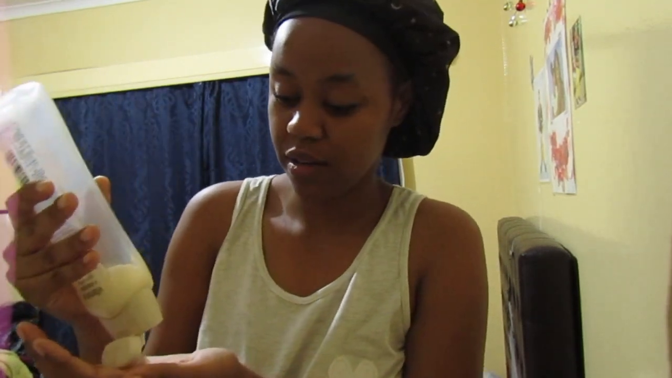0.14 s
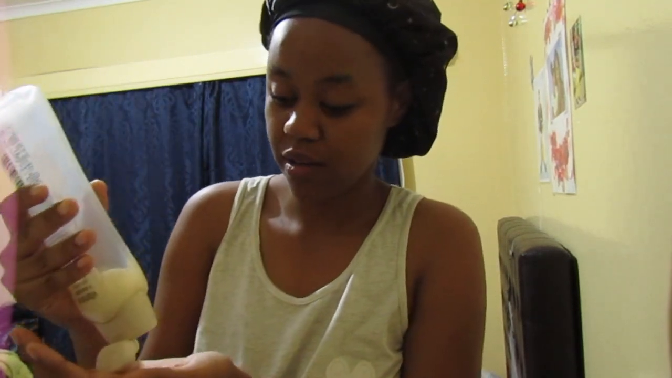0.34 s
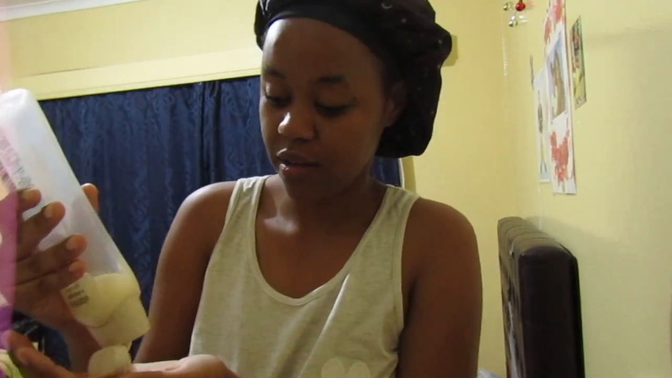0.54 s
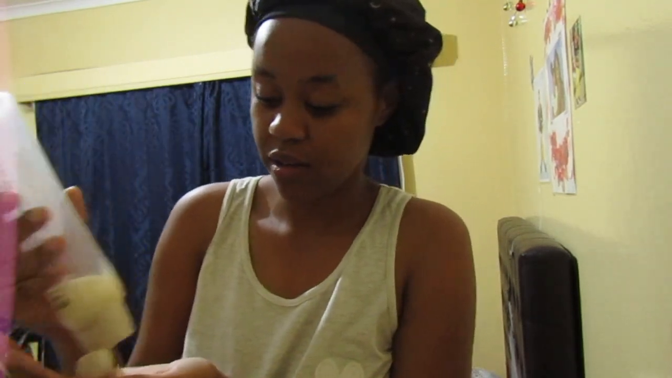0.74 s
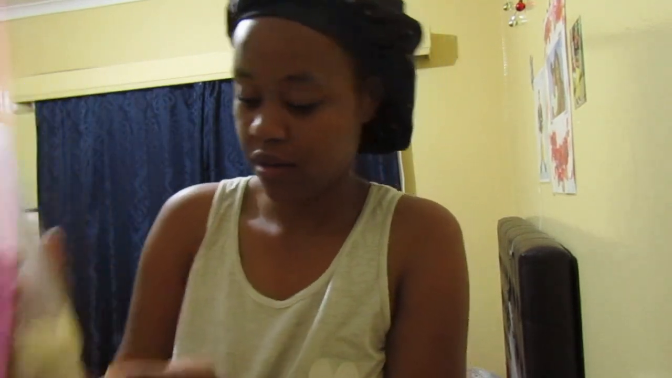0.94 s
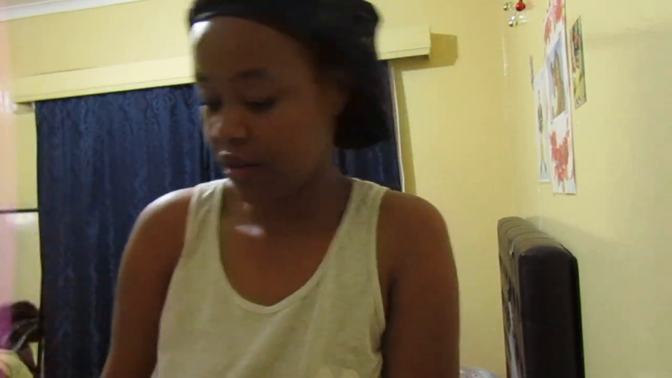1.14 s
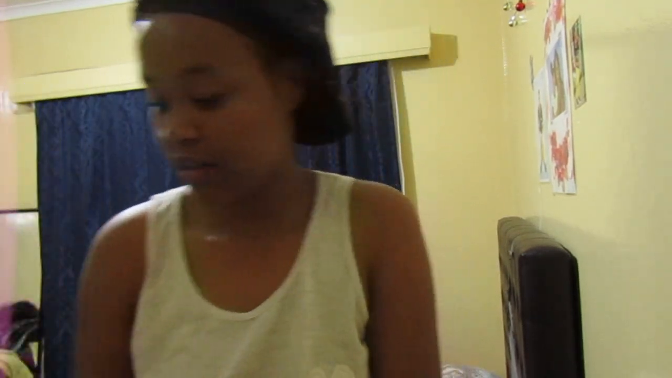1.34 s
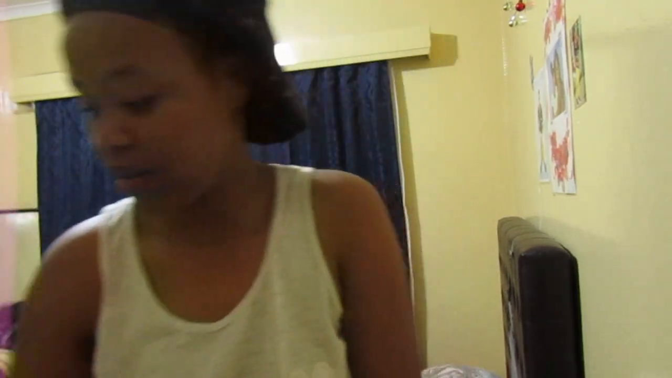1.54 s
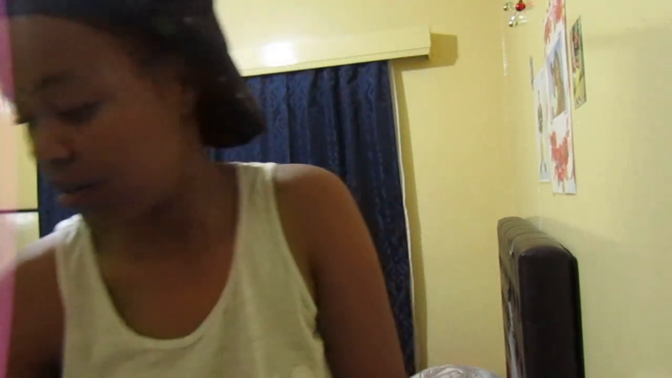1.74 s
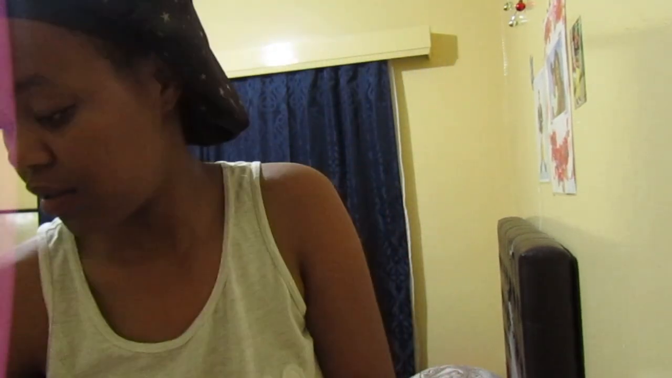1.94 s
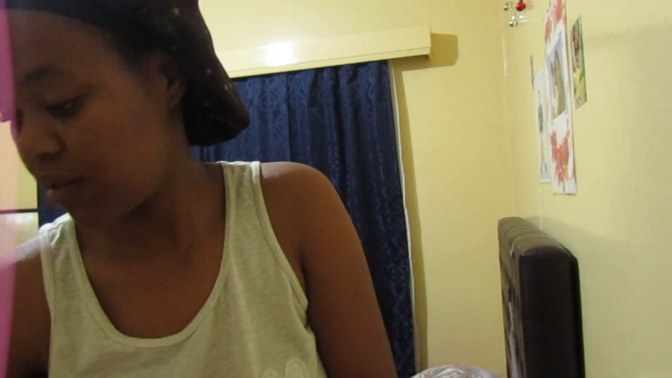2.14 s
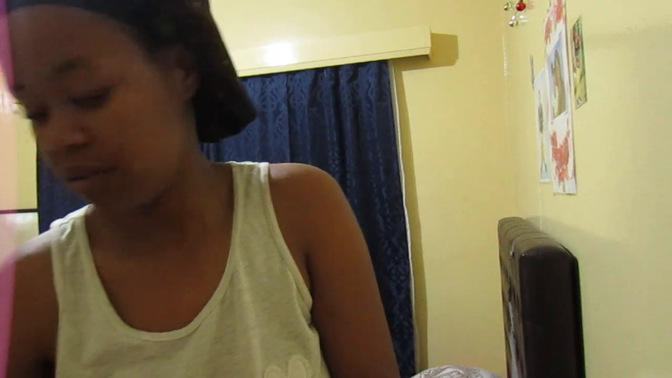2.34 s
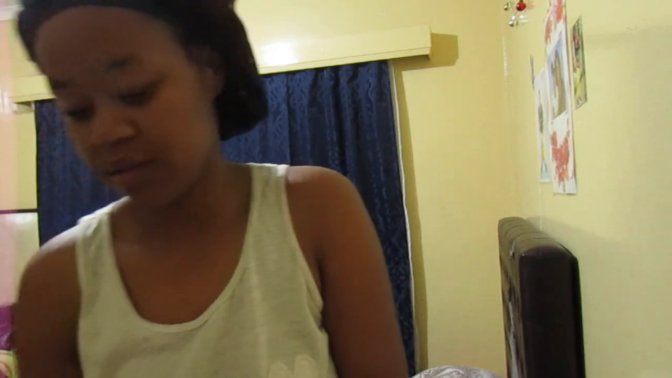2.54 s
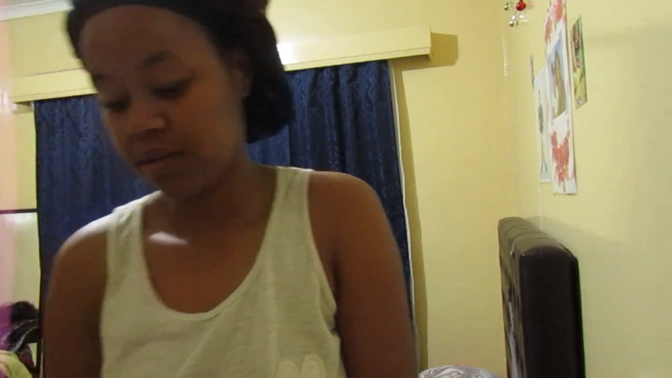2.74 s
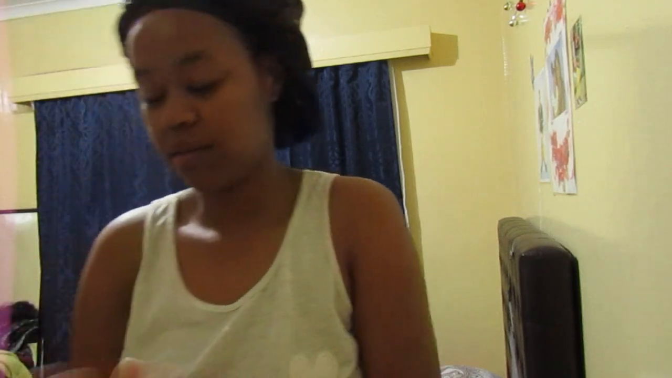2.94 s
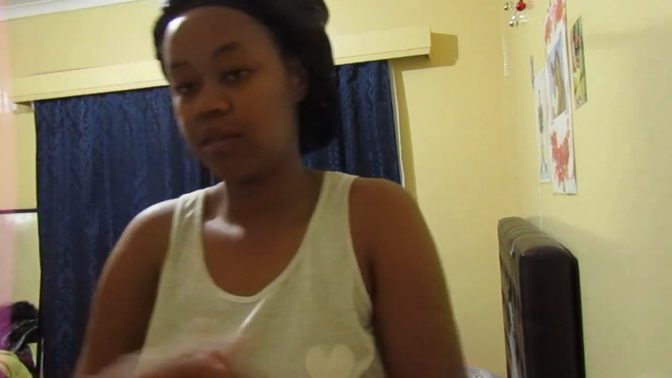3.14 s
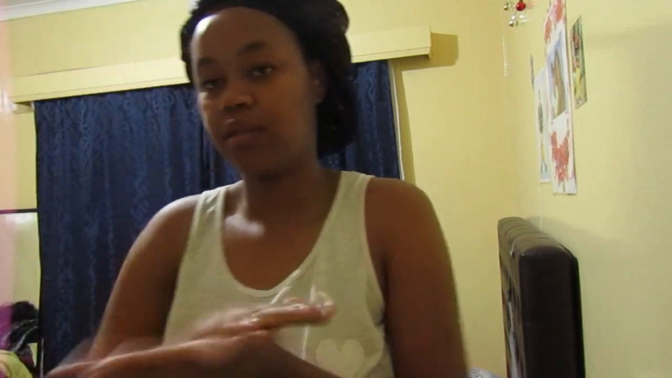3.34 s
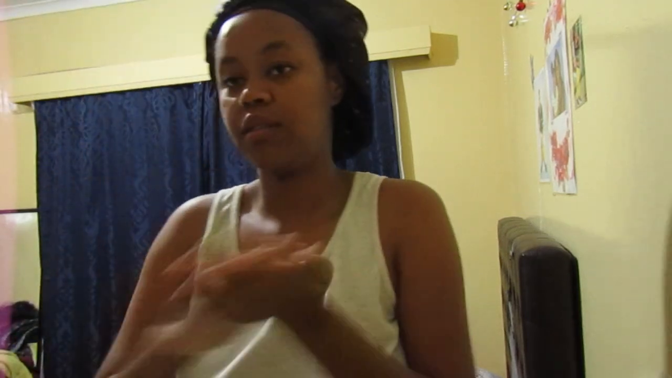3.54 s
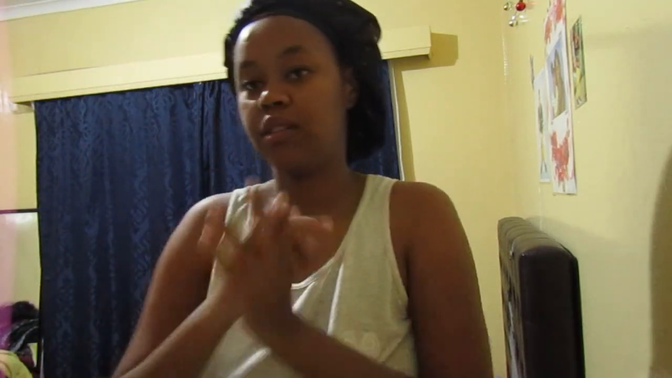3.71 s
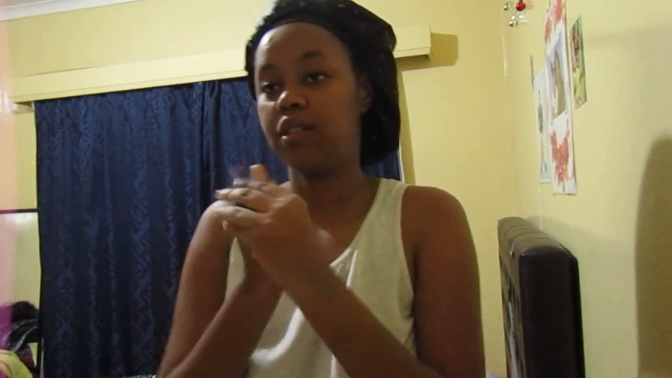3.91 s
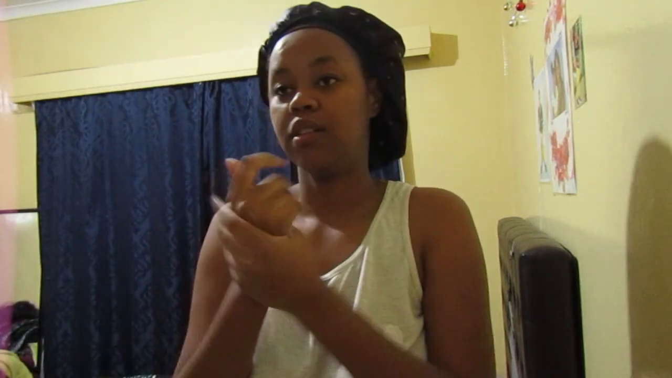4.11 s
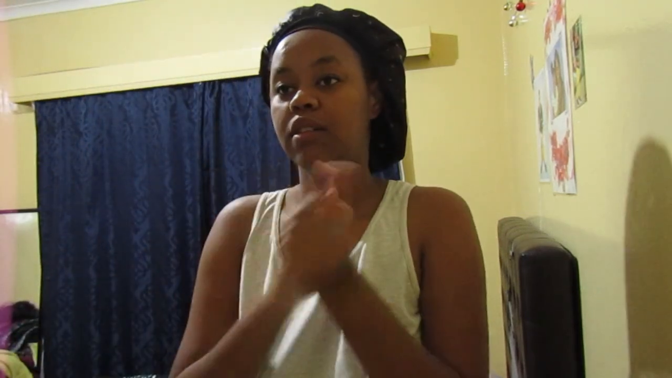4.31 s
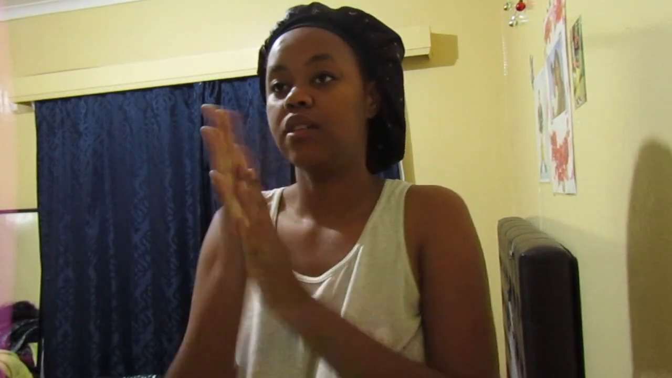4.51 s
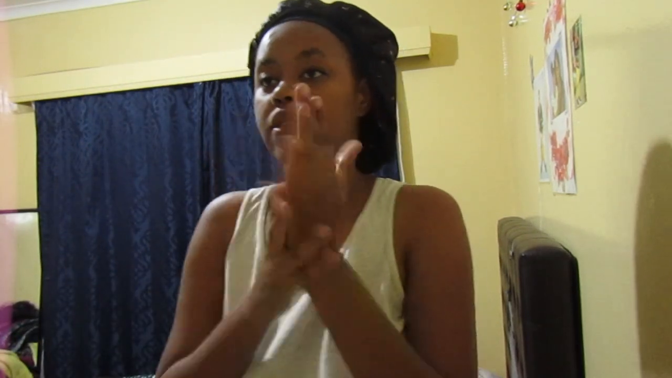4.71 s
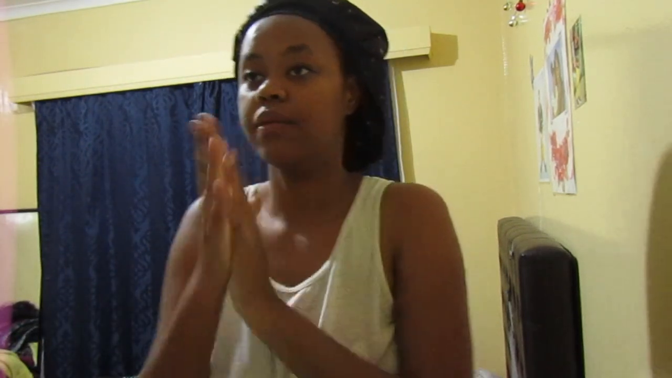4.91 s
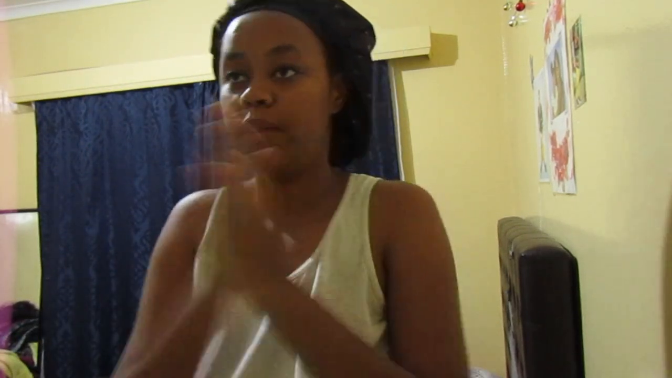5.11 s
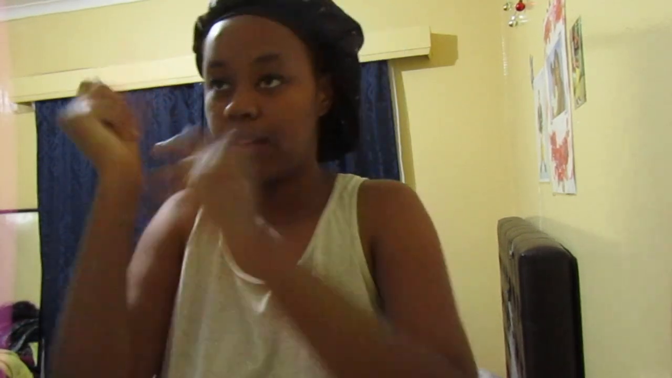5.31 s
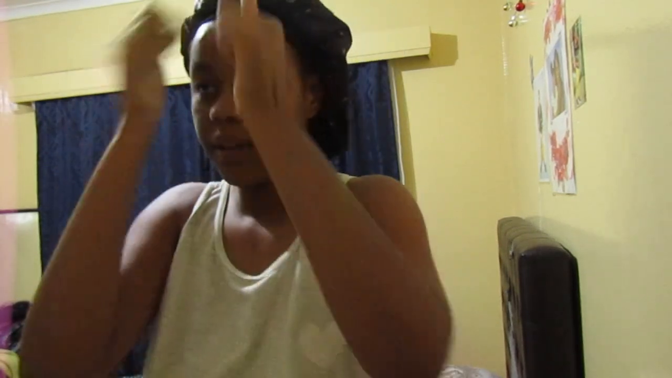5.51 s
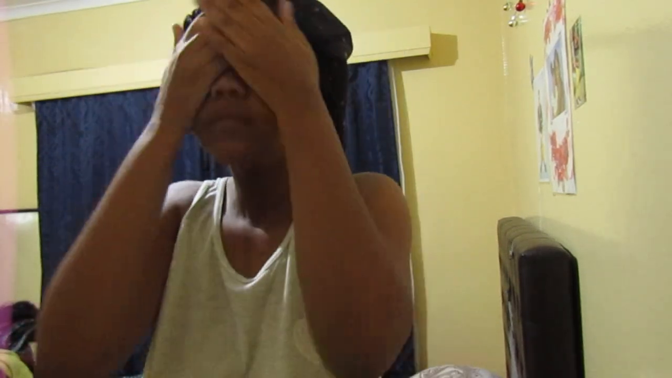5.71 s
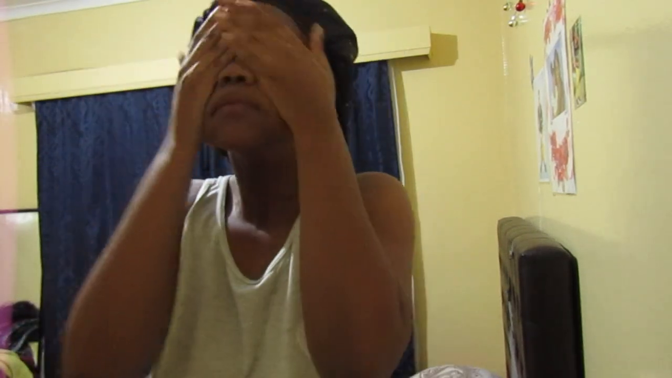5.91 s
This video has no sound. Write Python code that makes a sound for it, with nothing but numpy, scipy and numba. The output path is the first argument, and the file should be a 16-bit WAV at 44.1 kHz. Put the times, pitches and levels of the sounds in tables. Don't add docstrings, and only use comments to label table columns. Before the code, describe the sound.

Plastic cap click, a loud bottle thud on a table, faint low bumps, and soft slippery strokes of lotioned hands over steady hiss.

```python
import sys
import numpy as np
from scipy import signal
from scipy.fft import rfft, irfft, next_fast_len
from scipy.io import wavfile
from scipy.ndimage import uniform_filter1d
from numba import njit

SR = 44100
rng = np.random.default_rng(int(sys.argv[2]) if len(sys.argv) > 2 else 0)


def persist_wave(psi):
    counts = np.round(np.clip(psi, -1, 1) * 32767).astype(np.int16)
    wavfile.write(sys.argv[1], SR, np.atleast_2d(counts).T)


def voltage_ratio(level):
    return 10 ** (np.asarray(level, float) / 20)


N = 267246

# (full pressure from [s], held [s], level [dB], brightness [dB], cup of the hand [Hz])
GRIP = [
    (0.721, 0.014, -56, -6.5, 1150),
    (1.1, .025, -52.5, -16, 5160),
    (1.148, .015, -57, -12, 6700),
]
# (full pressure from [s], held [s], level [dB], brightness [dB], cup of the palm [Hz])
STROKES = [(2.905, .66, -52.5, -2, 2700), (3.8, 1.6, -66, -3, 3000), (2.905, .04, -51, -5, 1390),
           (2.96, .165, -50, -5.5, 2700), (3.15, .07, -49.5, -7, 2540), (3.315, .04, -49, -5, 3200),
           (3.42, .065, -51, -10, 3020), (3.551, .05, -53, -8.5, 1960), (3.65, 0.035, -58, -3, 1960),
           (3.88, 0.034, -56.5, -3.5, 3500), (3.991, 0.069, -57, -3, 3460), (4.17, 0.016, -60.5, -1, 3480),
           (4.3, 0.041, -53, -9, 2000), (4.445, 0.084, -50, -10.5, 2030), (4.606, 0.063, -48, -10, 2400),
           (4.809, 0.074, -53.5, -6, 3250), (4.97, 0.074, -46, -9, 2780), (5.128, .075, -46, -9, 2190),
           (5.351, .02, -62, -4, 3500), (5.48, 0.045, -64.5, -3, 3500)]
# (frequency [Hz], level [dB], t60 [s])
FRAME = [(129, -7, 0.13), (202.8, 0.5, 0.16), (255, -7, 0.051), (300.5, 0.5, 0.13), (332, -9, .09),
         (494, -9, 0.06)]


def colour(x, points):
    hz, db = np.transpose(points)
    size = next_fast_len(len(x))
    bins = np.maximum(np.fft.rfftfreq(size, 1 / SR), 1)
    gain = voltage_ratio(np.interp(np.log(bins), np.log(hz), db))
    return irfft(rfft(x, size) * gain, size)[:len(x)]


def unit(x):
    return x / np.sqrt(np.mean(x ** 2))


def filtered(x, order, hz, kind):
    return signal.sosfilt(signal.butter(order, hz, kind, fs=SR, output="sos"), x)


@njit
def svf(x, hz, q):
    y, band, low = np.empty(len(x)), 0., 0.
    for i in range(len(x)):
        g = np.tan(np.pi * hz[i] / SR)
        v = (band + g * (x[i] - low)) / (1 + g * (g + 1 / q))
        band, low, y[i] = 2 * v - band, low + 2 * g * v, v / q
    return y


def resonate(x, hz, q):
    return svf(x, np.full(len(x), 1. * hz), q)


def walk(rate_hz):
    hold = int(SR / rate_hz)
    levels = np.repeat(rng.standard_normal(N // hold + 1), hold)
    return 1.3 * uniform_filter1d(uniform_filter1d(levels, hold), hold)[:N]


def knock(blows, modes, scatter_db, floor_hz, edge=((20, 0), (20000, 0)), crack_db=-60, crack_s=.01):
    out, t = np.zeros(N + SR), np.arange(SR // 2) / SR
    hz, db, t60_s = np.transpose(modes)[:, :, None]
    spots = rng.standard_normal((len(blows), len(modes), 1))
    noises = rng.standard_normal((len(blows), len(t)))
    for (s, peak_db, contact_ms), spot, noise in zip(blows, spots, noises):
        decays = voltage_ratio(db + scatter_db * spot) * voltage_ratio(-60 * t / t60_s)
        ring = (decays * np.sin(2 * np.pi * hz * t)).sum(axis=0)
        push = np.sin(np.linspace(0, np.pi, int(max(contact_ms, 0) * SR / 1000) + 3))
        ring = np.convolve(ring, push)[:len(t)]
        ring = filtered(ring, 5, floor_hz, "high")
        crack = unit(colour(noise, edge)) * voltage_ratio(crack_db - 60 * t / crack_s)
        i = int(s * SR)
        out[i:i + len(t)] += voltage_ratio(peak_db) * (crack - ring / np.abs(ring).max())
    return out[:N]


def click(s, points, db):
    pulse = colour(1. * (np.arange(N) == int(s * SR)), points)
    return voltage_ratio(db) * pulse / np.linalg.norm(pulse)


def slips(count, grain_db):
    return rng.standard_normal(count) * voltage_ratio(grain_db * rng.exponential(size=count))


def patchy(x, patch_db):
    bands_hz = 700 * 2 ** np.arange(0, 4.6, .25)
    return unit(sum(resonate(x, hz, 3.6) * voltage_ratio(patch_db * walk(22)) for hz in bands_hz))


def friction(strokes, colours, grain_db):
    press_db_per_s, lift_db_per_s = 456, 210
    t = np.arange(N) / SR
    skin = patchy(colour(slips(N, grain_db), colours), patch_db=3)
    top = filtered(skin, 2, 7500, "high")
    power, treble = 1e-18, 1e-18
    for s, held_s, db, bright_db, _ in strokes:
        short_db = np.maximum(press_db_per_s * (s - t), lift_db_per_s * (t - s - held_s))
        pressure = voltage_ratio(db - np.maximum(short_db, 0)) ** 2
        power = power + pressure
        treble = treble + pressure * voltage_ratio(bright_db + 9)
    return (skin + top * (treble / power - 1)) * np.sqrt(power) * voltage_ratio(1.0 * walk(60))


def background():
    # (frequency [Hz], density [dB per Hz])
    air_colour = [(15, -38), (25, -29), (64, 1.5), (90, -23), (128, 2.5), (158, -20.5), (213, -8.5),
                  (278, -17), (318, -18), (1030, -20), (2300, -27.5), (12100, -37), (15000, -45)]
    # (frequency [Hz], width [Hz], level [dB rms])
    hum_lines = [(59.3, 25, -61), (119, 100, -60)]
    air = colour(rng.standard_normal(N), air_colour)
    air = air / np.std(filtered(air, 4, 400, "high"))
    out = voltage_ratio(-57 + 0.44 * walk(3.39)) * air
    for hz, width_hz, db in hum_lines:
        out = out + voltage_ratio(db) * unit(resonate(rng.standard_normal(N), hz, hz / width_hz))
    return out


def pockets():
    # (middle [s], frequency [Hz], level [dB])
    bubbles = [(.0, 990, -54.5), (0.329, 2410, -59), (.746, 1860, -54), (.729, 2850, -61),
               (1.153, 7400, -47.5), (2.979, 3980, -51.5), (3.03, 2700, -51), (3.32, 3200, -51),
               (3.455, 3050, -52), (3.612, 1960, -53), (3.21, 3970, -50), (3.345, 4770, -50),
               (3.348, 6350, -48.5), (3.439, 5800, -57), (3.09, 4700, -53), (3.1, 6100, -54),
               (4.505, 5300, -52), (4.51, 3000, -56), (4.612, 5300, -51), (.74, 1150, -51),
               (5.2, 2100, -51), (5.05, 2800, -52), (2.905, 1400, -53), (4.63, 3300, -55),
               (4.968, 3220, -51), (5.164, 3060, -45.5), (5.172, 4500, -51), (5.181, 5750, -49.5),
               (5.15, 6500, -49)]
    cup_db, cup_sag = -8, .07
    gap_hz, gap_db, gap_spread, gap_s = 5160, -8, .04, .075
    bubble_s = 0.069
    cups = [(s + held_s / 2, min(held_s + 0.046, .24), hz * (1 + cup_sag / 2), hz * (1 - cup_sag / 2), db + cup_db)
            for s, held_s, db, _, hz in STROKES + GRIP]
    widths_hz = gap_hz * (1 + gap_spread * rng.standard_normal((len(STROKES), 2)))
    gaps = [(row[0] + .015, gap_s, *hz, row[2] + gap_db) for row, hz in zip(STROKES, widths_hz)]
    rows = cups + gaps + [(s, bubble_s, hz, hz, db) for s, hz, db in bubbles]
    out = np.zeros(N + 2 * SR)
    for (s, length_s, first_hz, last_hz, db), noise in zip(rows, slips((len(rows), SR // 4), 1.1)):
        n = int(length_s * SR)
        ring = svf(noise[:n], np.linspace(first_hz, last_hz, n), 10.0)
        i = SR + int(s * SR) - n // 2
        out[i:i + n] += voltage_ratio(db) * unit(ring) * np.hanning(n)
    return out[SR:SR + N]


def ticks():
    # (time [s], peak [dB], centre [Hz], t60 [s])
    tick_events = [(0.317, -43.5, 2500, 0.038), (0.513, -43, 9100, 0.033), (0.716, -48, 2500, .03),
                   (1.147, -36, 6860, 0.036), (2.3, -36.5, 7440, 0.022), (2.8898, -35.5, 1990, 0.081),
                   (5.3404, -41, 7500, 0.028), (5.8968, -30.5, 2480, 0.033), (5.899, -36, 400, 0.05),
                   (1.4565, -45, 800, .03), (2.31, -48, 1300, .05)]
    out, t = np.zeros(N + SR), np.arange(SR // 10) / SR
    for (s, peak_db, hz, t60_s), noise in zip(tick_events, rng.standard_normal((len(tick_events), len(t)))):
        burst = noise * voltage_ratio(-60 * t / max(t60_s, .002))
        burst = 0.49 * burst + resonate(burst, hz, 0.62)
        i = int(s * SR)
        out[i:i + len(t)] += voltage_ratio(peak_db) * burst / np.abs(burst).max()
    return out[:N]


def fingers():
    return friction(GRIP, [(1500, -8.5), (5000, -9), (15000, -10)], grain_db=3.5)


def cap_snap():
    # (time [s], peak [dB], contact [ms])
    snap = [
        (.8625, -19, .1),
        (.8642, -15, .1),
        (.8651, -3.5, .08),
        (.8705, -15, .08),
        (.9100, -19, .03),
        (.9108, -10, .05),
    ]
    # (frequency [Hz], level [dB], t60 [s])
    cap_modes = [(404, -22.5, 0.012), (615, -6, 0.021), (1110, -5, 0.043), (1330, -1.5, 0.012),
                 (2600, 2.5, 0.004), (3620, -18, .005), (3740, 11, 0.005), (4750, 1.5, .005),
                 (5350, 3, 0.004)]
    # (frequency [Hz], level [dB])
    cap_crack = [(250, -22), (600, -13.5), (1300, 4), (2100, -12.5), (3800, -11.5), (5300, -5),
                 (6500, -22.5), (10500, -20.5), (15000, -34.5)]
    latch_db = 6.5
    cap = knock(snap, cap_modes, scatter_db=1.5, floor_hz=300, edge=cap_crack, crack_db=-10, crack_s=0.016)
    latch = click(snap[2][0], cap_crack, latch_db) + click(snap[5][0], cap_crack, latch_db - 4)
    return cap, latch


def edge_taps():
    # (time [s], peak [dB], contact [ms])
    taps = [
        (.915, -36, 2.9),
        (1.4575, -31, 1.6),
        (1.59, -43, 2.3),
    ]
    # (frequency [Hz], level [dB], t60 [s])
    edge_modes = [(150, -5, 0.066), (214, -3.5, 0.044), (460, -1, 0.026), (620, -10, .03)]
    return knock(taps, edge_modes, scatter_db=2.1, floor_hz=89)


def bottle_bang():
    # (time [s], peak [dB], contact [ms])
    bang = [
        (1.8137, 6.5, 0.6),
        (1.8205, -8, 0.2),
    ]
    # (frequency [Hz], level [dB], t60 [s])
    top_modes = [(205, 9, 0.1), (253, 2, 0.03), (290, 0.5, 0.13), (318, 8, 0.05), (392, -5, 0.09),
                 (496, -9, 0.08), (600, -10, 0.04), (800, -16, 0.04), (1000, -2, 0.03), (1164, 4.5, 0.022),
                 (1320, 2, 0.03), (1590, -22.5, 0.017), (3750, -11.5, .003)]
    # (frequency [Hz], level [dB])
    bang_crack = [(300, -43), (700, 6.5), (1500, -4.5), (3000, -2.5), (5000, -12.5), (11000, -20),
                  (15000, -42)]
    # (frequency [Hz], level [dB])
    clatter = [(300, -10), (600, 6), (1300, 4.5), (3000, -3), (5000, -11.5), (11000, -20), (15000, -37)]
    bottle = knock(bang, top_modes, scatter_db=1.1, floor_hz=188, edge=bang_crack, crack_db=-13.5, crack_s=0.028)
    body = filtered(bottle, 2, 600, "low")
    return bottle, body + click(bang[0][0], clatter, 18)


def leg_boom():
    # (frequency [Hz], level [dB], t60 [s])
    leg_modes = [(88, -4.5, 0.35), (121, 5.5, .4)]
    return knock([(1.816, -25, 8.6)], leg_modes, scatter_db=0.0, floor_hz=50)


def lean():
    # (time [s], level [dB])
    lean_levels = [(2.2, -56), (2.4, -56.5), (2.66, -70), (2.82, -51), (2.94, -49), (3.25, -56),
                   (3.67, -65), (3.87, -53.5), (4.4, -75)]
    s, db = np.transpose(lean_levels)
    t = np.arange(N) / SR
    push = rng.standard_normal(N)
    murmur = sum(voltage_ratio(mode_db) * resonate(push, hz, 11) for hz, mode_db, _ in FRAME[1:5])
    return unit(murmur) * voltage_ratio(np.interp(t, s, db, left=-99, right=-99) - 2.5)


def thumps():
    # (time [s], peak [dB], contact [ms])
    thump_events = [(2.319, -26, 2.6), (2.561, -29, 2), (2.73, -45.5, 0.99), (2.775, -28, 2.7),
                    (2.903, -30, 3.5), (2.948, -34.5, 3.3), (3.066, -37.5, 4.6), (3.22, -32, 2),
                    (3.345, -34.5, 2.1), (3.415, -39, 3.1), (3.567, -41.5, 3.6), (3.709, -40.5, 1.2),
                    (3.892, -41.5, 3.3)]
    return knock(thump_events, FRAME, scatter_db=3.5, floor_hz=98)


def palms():
    # (frequency [Hz], density [dB per Hz])
    skin_colour = [(410, -64), (700, -12), (940, -14), (2760, -4), (3610, -4.5), (5170, -3.5), (7410, -4.5),
                   (8000, -6), (11200, -7.5), (15000, -16.5)]
    return friction(STROKES, skin_colour, grain_db=2.4)


def room(x):
    # (frequency [Hz], t60 [s], level [dB])
    walls = [(157, 0.28, -8), (472, 0.29, -2), (1390, 0.29, 2), (3570, 0.24, -2.5), (5950, 0.22, 5.5),
             (10960, 0.23, 4)]
    wet_db = -8.5
    t = np.arange(SR // 2) / SR
    tail = sum(voltage_ratio(db - 60 * t / t60_s) * unit(resonate(rng.standard_normal(len(t)), hz, 0.42))
               for hz, t60_s, db in walls)
    tail = tail * np.clip((t - .002) / 0.0029, 0, 1)
    return voltage_ratio(wet_db) * signal.fftconvolve(x, tail / np.linalg.norm(tail))[:N]


def scene():
    cap, latch = cap_snap()
    bottle, blow_to_walls = bottle_bang()
    table = edge_taps() + leg_boom() + lean() + thumps()
    near = table + voltage_ratio(-0.6) * palms() + fingers() + pockets() + ticks()
    spread = voltage_ratio(1.5) * cap + latch + blow_to_walls
    return (near + cap + bottle + room(near + spread) + background())[None]


@njit
def follow(x, attack, release):
    y, level = np.empty(len(x)), 0.
    for i in range(len(x)):
        level += (abs(x[i]) - level) * (attack if abs(x[i]) > level else release)
        y[i] = level
    return y


def roll_off(x):
    return signal.sosfilt(signal.butter(12, 16340, fs=SR, output="sos"), x)


def record(dry):
    whine_hz, whine_db = 11793, -78
    notch_hz, top_hz = 7870, 14900
    whine = np.sqrt(2) * np.sin(2 * np.pi * whine_hz * np.arange(N) / SR)
    dry = dry + voltage_ratio(whine_db) * whine
    quick = follow(dry[0], 1 / (0.0014 * SR), 1 / (.12 * SR))
    slow = follow(dry[0], 1 / (.003 * SR), 1 / (.8 * SR))
    quick_gain = np.minimum(voltage_ratio(-33.5) / (quick + 1e-9), 1) ** .12
    slow_gain = np.minimum(voltage_ratio(-12.0) / (slow + 1e-9), 1) ** 0.28
    ducked = dry * quick_gain * slow_gain
    notched = signal.lfilter(*signal.iirnotch(notch_hz, 35, fs=SR), ducked)
    band = signal.sosfilt(signal.ellip(10, .3, 70, top_hz, fs=SR, output="sos"), notched)
    return roll_off(np.clip(band, -.98, .98))


dry = scene()
out = record(dry)
persist_wave(out)
```